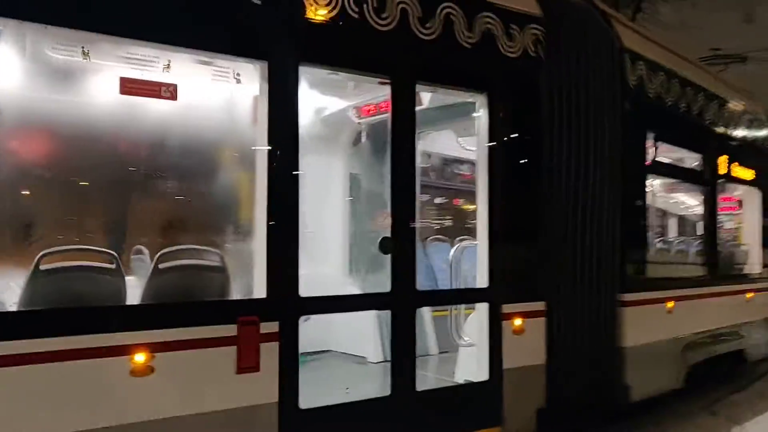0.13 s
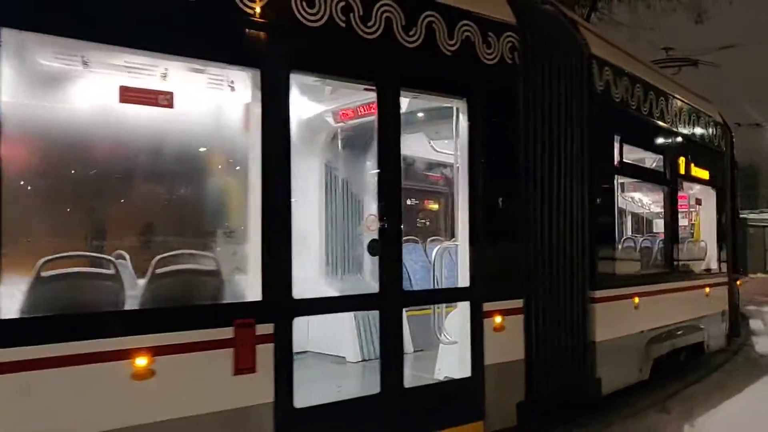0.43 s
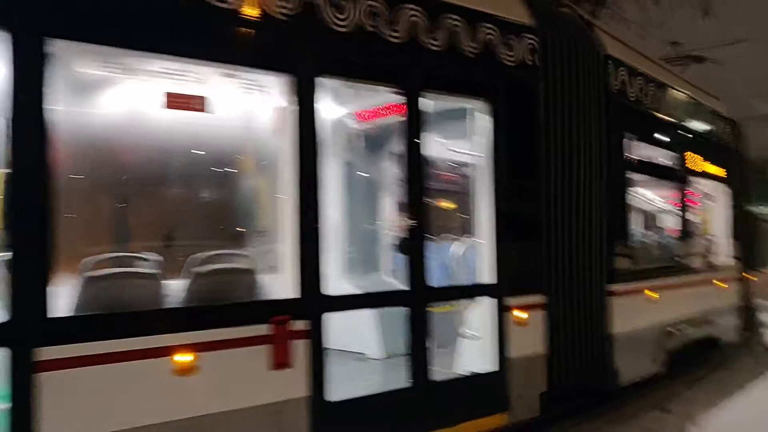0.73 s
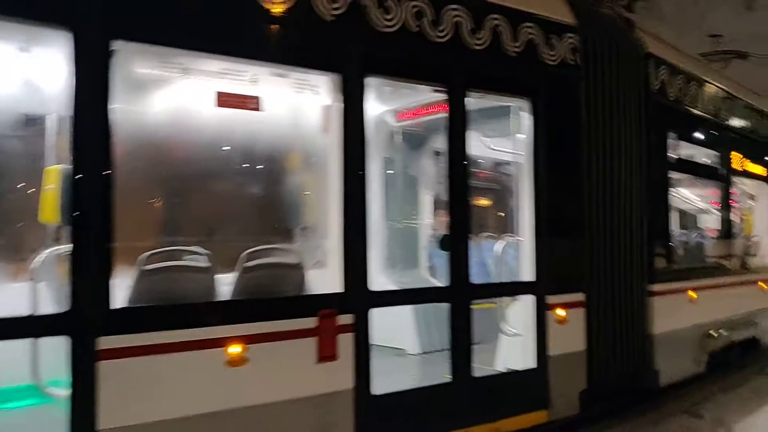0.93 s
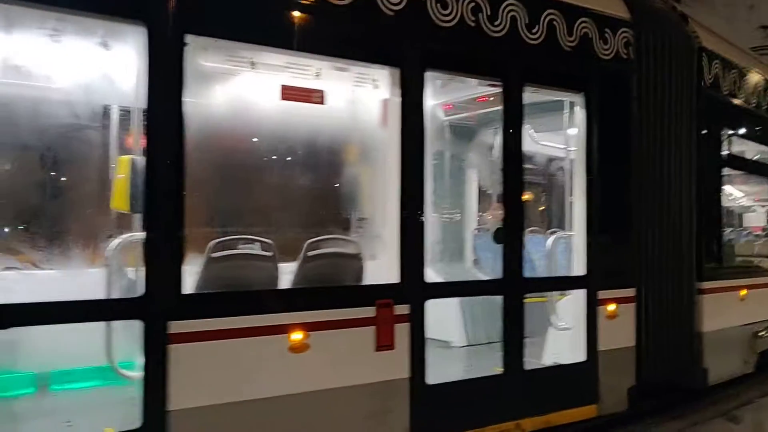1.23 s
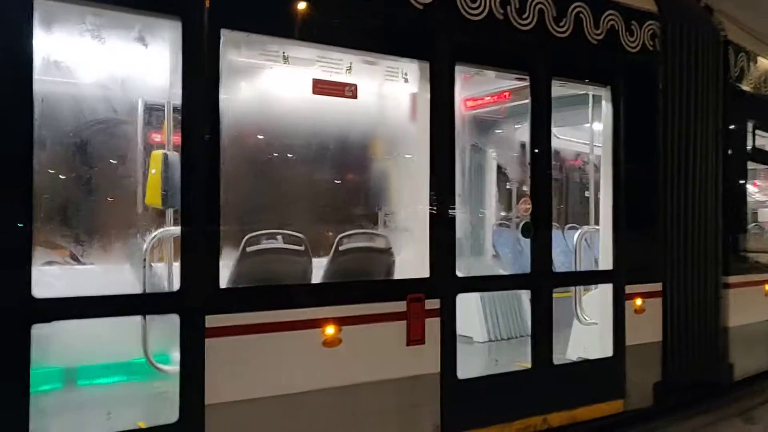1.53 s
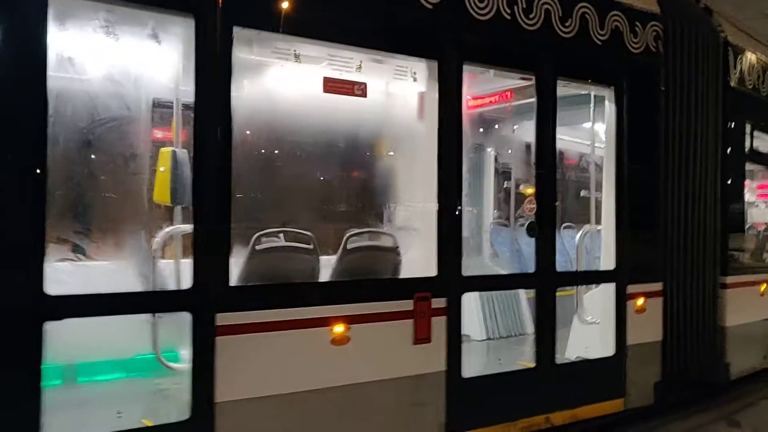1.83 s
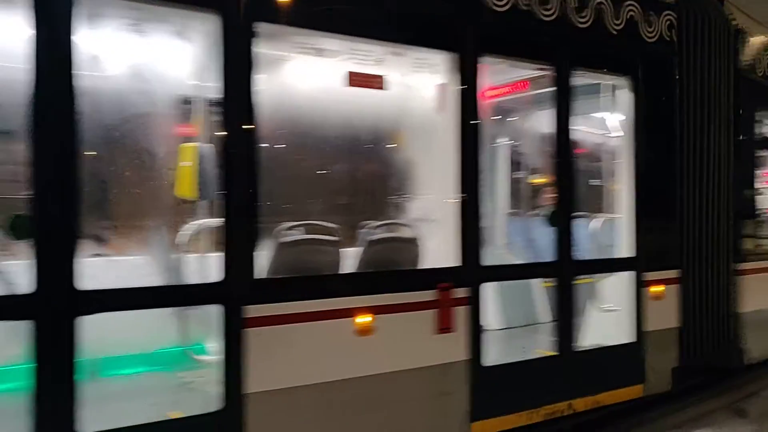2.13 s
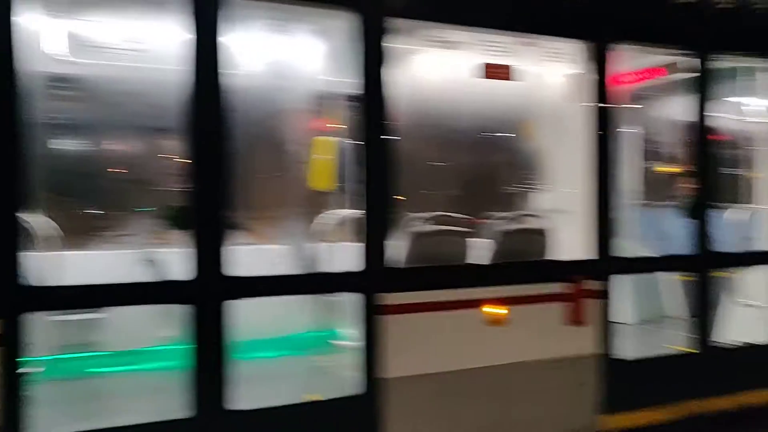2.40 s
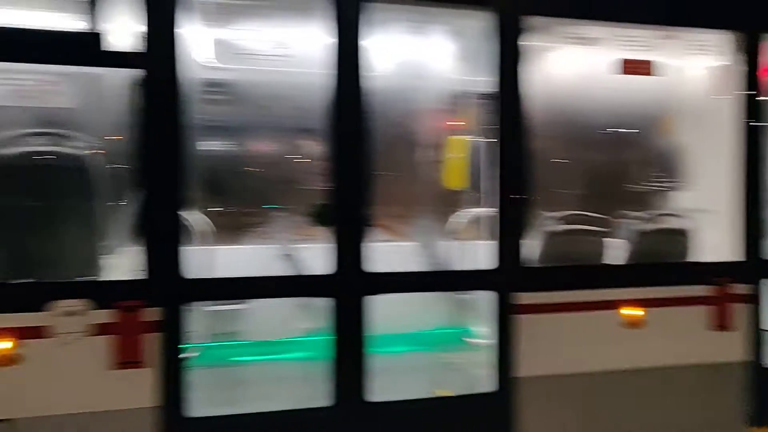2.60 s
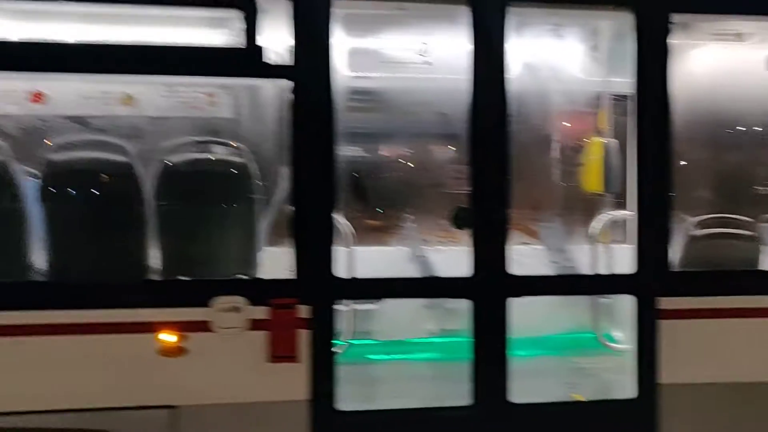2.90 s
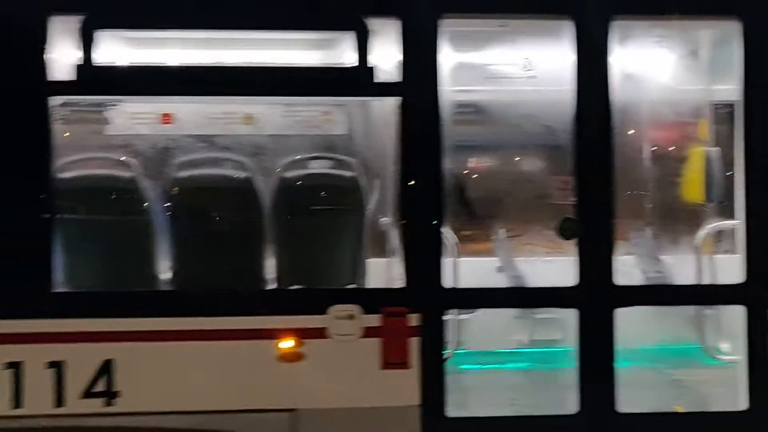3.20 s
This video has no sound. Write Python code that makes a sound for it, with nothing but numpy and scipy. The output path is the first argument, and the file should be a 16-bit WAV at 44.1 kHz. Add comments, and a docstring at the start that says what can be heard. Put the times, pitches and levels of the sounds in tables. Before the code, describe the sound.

A parked tram rumbles and hums deeply at night, with fan rush and a fading high whine.

```python
"""Beside a parked tram at night, machinery rumbles and hums, fans rush from the left and a converter whines.
A motor runs down, and the whine fades out of earshot as someone walks slowly along the tram's side.
Close by are soft scuffs, ticks, a small squeak, three bumps on the microphone and wind on its left port.
Shaped noise makes the rumble, drone, fans, scuffs, ticks and wind; sine waves make the hum, whine and squeak.
Smooth pulses make the bumps and wind slaps."""
import sys
import numpy as np
from scipy.fft import rfft, irfft, next_fast_len
from scipy.io import wavfile
from scipy.ndimage import map_coordinates

SR = 44100
rng = np.random.default_rng(int(sys.argv[2]) if len(sys.argv) > 2 else 0)


def inscribe(sig):
    """Save sig as 16-bit PCM at rate SR to the path in sys.argv[1].

    A 1-D sig is mono; a 2-D sig holds one channel per row.
    Samples are clipped to [-1, 1] before scaling.
    """
    pcm = np.round(np.clip(np.atleast_2d(sig).T, -1, 1) * 32767)
    wavfile.write(sys.argv[1], SR, pcm.astype(np.int16))


N = 147735


def amp(db):
    """Turn decibels into a plain multiplier."""
    return 10 ** (np.asarray(db) / 20)


def unit(x):
    """Scale a sound to an average (rms) strength of 1."""
    return x / np.sqrt(np.mean(x ** 2) + 1e-20)


def clock():
    """The time of every sample in seconds."""
    return np.arange(N) / SR


def colour(points, hz):
    """Turn (Hz, dB) points into a gain at each frequency, joined on a log axis."""
    point_hz, point_db = np.transpose(points)
    return amp(np.interp(np.log(hz + 1), np.log(point_hz + 1), point_db))


def curves(rows):
    """Draw each column after the time as a curve with one value per sample."""
    times, *columns = np.transpose(rows)
    return [np.interp(clock(), times, column) for column in columns]


def wobble(rate):
    """A smooth random curve through rate random points a second."""
    return map_coordinates(rng.standard_normal(2048), [clock() * rate], mode="mirror")


def filtered(x, response):
    """Multiply each frequency of x by a response, which may also shift its timing."""
    size = next_fast_len(N + 8192)
    spectrum = rfft(x, size) * response(np.fft.rfftfreq(size, 1 / SR))
    return irfft(spectrum, size)[..., :N]


def rush(spectrum, alike):
    """Stereo noise of rms 1, rolled off in the high treble; alike is the likeness of left and right."""
    def shape(hz):
        roll_off = (1 + (hz / (2 * spectrum[-1][0])) ** 2) ** 2
        return colour(spectrum, hz) / roll_off

    mid, side = filtered(rng.standard_normal((2, N)), shape)
    turn = np.arccos(np.clip(alike, -1, 1)) / 2
    return unit(np.cos(turn) * mid + np.sin(turn) * np.array([side, -side]))


def swell(s, width):
    """A bell-shaped rise and fall around time s; width is its standard deviation in seconds."""
    return np.exp(-.5 * ((clock() - s) / width) ** 2)


def from_left(x, lag_s):
    """Sound from the left reaches the left port lag_s seconds before the right."""
    sides = np.array([[1], [-1]])
    return filtered(x, lambda hz: np.exp(1j * np.pi * hz * lag_s * sides))


def machinery(rumble_alike=0.58, drone_alike=0.97):
    """Low noise makes the deep rumble; a higher, more restless band makes the drone of the body."""
    # Loudness over time: t/s, level/dB
    rumble_level = [(0, -28.5), (.6, -26.5), (1.3, -25.5), (1.55, -25), (1.68, -23), (1.85, -25),
                    (2.05, -32), (2.6, -28.5), (3.35, -25)]
    drone_level = [(0, -34), (.17, -29), (.45, -33), (1, -34), (1.35, -39), (1.7, -39.5), (2, -38.5),
                   (2.5, -39.5), (3.35, -43.5)]
    # Relative strength per hertz: f/Hz, level/dB
    rumble_spectrum = [(12, -18), (22, 0.5), (33, 5), (50, -0.5), (75, -4.5), (100, -7.5), (130, -17),
                       (250, -29.5), (500, -34)]
    drone_spectrum = [(70, -13), (112, 1), (128, -2.5), (150, 2), (180, -3.5), (215, -7), (260, -9),
                      (320, -9.5), (380, -16.5), (600, -26.5), (1500, -39)]
    rumble_db, = curves(rumble_level)
    drone_db, = curves(drone_level)
    rumble = amp(rumble_db + 0.32 * wobble(6.7)) * rush(rumble_spectrum, rumble_alike)
    drone = amp(drone_db + 1.3 * wobble(17)) * rush(drone_spectrum, drone_alike)
    return rumble + drone


def hum(waver_db=1.5, waver_rad=0.27, tone_wander_rad=1.2):
    """A motor's firm low note and weaker machine tones are sine waves that wander in pitch and level."""
    # Motor note: t/s, f/Hz, level/dB
    note_path = [(0, 59.4, -36.5), (.11, 57.1, -23), (.2, 57, -32), (.33, 56.2, -38), (.42, 58.8, -24),
                 (.54, 59.35, -22.5), (.65, 58.62, -29.5), (.85, 60.7, -23), (.96, 59.75, -34.5),
                 (1.1, 60.44, -27.5), (1.25, 60.63, -33), (1.43, 60.1, -27), (1.53, 59.77, -29),
                 (1.65, 60, -26), (1.75, 60.33, -33.5), (2.09, 59.96, -29), (2.25, 59.46, -35.5),
                 (2.5, 59.74, -23.5), (2.62, 60.1, -27.5), (2.8, 59.87, -28), (2.89, 60.07, -31),
                 (3.07, 60.56, -20), (3.22, 58.4, -42), (3.35, 63.3, -24.5)]
    # Weaker machine tones: f/Hz, level/dB
    weak_tones = [(100, -46), (329, -53.5)]
    hz, level_db = curves(note_path)
    # Adding up the pitch gives the phase of the wave
    phase = 2 * np.pi * np.cumsum(hz) / SR + waver_rad * wobble(30.24)
    sound = amp(level_db + waver_db * wobble(19)) * np.sin(phase)
    for tone_hz, db in weak_tones:
        tone_phase = 2 * np.pi * tone_hz * clock() + tone_wander_rad * wobble(5)
        sound += amp(db + 2.16 * wobble(5.98)) * np.sin(tone_phase)
    return np.sqrt(2) * sound  # a sine of height sqrt(2) has rms 1


def run_down(octave_below_db=-1, waver_rad=0.11):
    """As a motor slows, its tone and the octave below sink together."""
    # Slowing motor: t/s, f/Hz, level/dB
    motor_path = [(1.1, 334, -86), (1.22, 327.6, -47.5), (1.38, 309.5, -48), (1.55, 284.2, -53),
                  (1.66, 271, -41.5), (1.8, 251.5, -43), (1.92, 237.2, -83)]
    hz, level_db = curves(motor_path)
    phase = 2 * np.pi * np.cumsum(hz) / SR + waver_rad * wobble(30)
    tones = np.sin(phase) + amp(octave_below_db) * np.sin(phase / 2)
    return np.sqrt(2) * amp(level_db) * tones


def fans(street_db=-43, lag_s=0.000452, pan_db=-2):
    """Fan noise reaches the left port first; the street scatters it back, under a hiss of air."""
    # Relative strength per hertz of direct fans, street return and air hiss: f/Hz, level/dB
    fan_spectrum = [(200, -0.5), (400, -4), (600, -1), (850, 1.5), (1300, -1), (1700, -6.5), (2300, -12),
                    (3200, -16), (5000, -30.5), (9000, -18.5)]
    street_spectrum = [(150, -32), (310, 1.5), (400, -1.5), (550, -3.5), (950, -0.5), (1400, -12.5),
                       (2100, -11.5), (3000, -27), (4500, -26), (9000, -37.5)]
    hiss_spectrum = [(1500, -25), (3000, -0.5), (4200, -1), (5400, 1), (6300, 1.5), (7200, -2),
                     (8400, -2.5), (10000, 0), (15000, -2.5)]
    # Loudness along the tram: t/s, level/dB
    fan_level = [(0, -40.5), (.8, -45), (1.6, -44), (2.3, -46), (2.8, -43.5), (3.35, -44.5)]
    hiss_level = [(0, -45.5), (.4, -47.5), (.8, -47.5), (1.05, -50), (1.3, -50), (1.5, -48.5),
                  (1.85, -47.5), (2.1, -51.5), (2.55, -53), (2.85, -50.5), (3.35, -52)]
    fan_db, = curves(fan_level)
    hiss_db, = curves(hiss_level)
    direct = from_left(rush(fan_spectrum, alike=0.97), lag_s) * amp(fan_db + 2.0 * wobble(6.05))
    scattered = rush(street_spectrum, alike=0.068) * amp(street_db + 0.87 * wobble(4.1))
    hiss = rush(hiss_spectrum, alike=0) * amp(hiss_db + 0.83 * wobble(19))
    # pan_db is left minus right: the fans come first on the left, yet are slightly louder on the right
    balance = amp(pan_db / 2 * np.array([[1], [-1]]))
    return (direct + scattered) * balance + hiss


def whine(beat_hz=16, beat_wander_rad=1.2, echo_db=-4.5, lag_s=.00044):
    """The converter's tone beats with its reflection; its overtones flutter less and fade sooner."""
    # Whine as the listener walks: t/s, f/Hz, level/dB, left minus right/dB
    whine_path = [(0, 5024, -48, 6), (.11, 5024, -41, 7), (.2, 5020, -47.5, 3), (.38, 5018, -51, 2),
                  (.52, 5014, -48.5, 3), (.75, 5010, -51.5, 1), (.9, 5014, -48.5, 4),
                  (1.05, 5010, -51.5, 3), (1.25, 5010, -49.5, 3), (1.82, 5008, -53, -1),
                  (1.95, 5000, -62, 2), (2.05, 4998, -60, 4), (2.2, 4995, -80, 0)]
    # Tones within the whine: multiple of the main pitch, relative level/dB
    partials = [(1, -.5), (1.496, -9.5), (1.999, -4), (3, -21)]
    flutter_rate, fuzz_rate = 30, 140  # random points per second
    flutter_depth_db, fuzz_depth_db = 1.8, 2.5
    drift_rad, fuzz_rad = .4, .3
    overtone_fade = 1.5  # dB per second
    hz, level_db, pan_db = curves(whine_path)
    phase = 2 * np.pi * np.cumsum(hz) / SR + drift_rad * wobble(flutter_rate)
    beat = 2 * np.pi * beat_hz * clock() + beat_wander_rad * wobble(beat_hz)
    flutter_db = flutter_depth_db * wobble(flutter_rate)

    def partial(k):
        """One tone and its reflection, at k times the main pitch."""
        beads = unit(amp(flutter_db / k + fuzz_depth_db * wobble(fuzz_rate)))
        direct = k * (phase + fuzz_rad * wobble(fuzz_rate))
        echo = k * (phase - beat) + drift_rad * wobble(flutter_rate)
        pair = unit(np.sin(direct) + amp(k * k * echo_db) * np.sin(echo))
        fade_db = -overtone_fade * clock() * (k > 1)
        return amp(fade_db) * beads * pair

    # Each port gets its own fine randomness
    ports = np.array([sum(amp(db) * partial(k) for k, db in partials) for _ in range(2)])
    balance_db = pan_db / 2 * np.array([[1], [-1]])
    return amp(level_db + balance_db) * from_left(ports, lag_s)


def scuffs(octaves=0.22, grain_db=7.5):
    """Shoes or clothing brush softly: bands of noise swell briefly with a grainy loudness."""
    # Brushes: t/s, width/s, centre f/Hz, level/dB
    brushes = [(0.146, 0.022, 8300, -49), (.228, 0.016, 5700, -46.5), (.265, 0.016, 4400, -48),
               (1.68, 0.039, 8400, -48.5), (1.825, 0.022, 4040, -53), (2.735, 0.028, 6060, -53)]
    out = np.zeros((2, N))
    for s, width, centre_hz, db in brushes:
        def band_shape(hz):
            return 1 / (1 + (np.log2((hz + 1) / centre_hz) / octaves) ** 2)

        band = filtered(rng.standard_normal((2, N)), band_shape)
        grains = unit(band * amp(grain_db * wobble(300)))
        out += amp(db) * swell(s, width) * grains
    return out


def ticks(pivot_hz=8500, t60_s=.006):
    """Short clicks are noise that starts at once and dies fast, some brighter than others."""
    # Clicks: t/s, starting level/dB, treble tilt/(dB per octave)
    clicks = [(.687, -25, 25), (0.7, -37.5, 5), (1.601, -37, -6), (1.672, -36, 5), (1.7237, -25.5, -1.5),
              (2.0468, -28, -2.5), (3.138, -38, -5)]
    # Click strength per hertz before tilting: f/Hz, level/dB
    click_spectrum = [(3000, -22), (6000, -36), (8200, 2), (10000, -6), (15000, -10.5)]
    t, out = clock(), np.zeros((2, N))
    for s, db, tilt_db in clicks:
        tilted = [(hz, level + tilt_db * np.log2(hz / pivot_hz)) for hz, level in click_spectrum]
        crack = rush(tilted, alike=0)
        # The level falls by 60 dB in t60_s seconds
        out += (t >= s) * amp(db - 60 * abs(t - s) / t60_s) * crack
    return out


def squeak(right_db=-6, glide_hz_per_s=4000, rough_rad=.8):
    """One faint, slightly rough sine wave rises in pitch, louder on the left."""
    # Squeak, a single row: t/s, width/s, f/Hz at the middle, level/dB
    squeak_row = (1.812, .014, 2490, -47.5)
    s, width, hz, db = squeak_row
    t = clock() - s
    phase = 2 * np.pi * (hz * t + glide_hz_per_s * t ** 2 / 2) + rough_rad * wobble(250)
    return np.sqrt(2) * amp(db) * swell(s, width) * np.sin(phase) * amp([[0], [right_db]])


def bumps(push_s=0.00076, push_delay_s=0.0027, push_db=-5.5):
    """A finger taps the housing, then pushes more softly; a longer contact sounds duller."""
    # Taps: t/s, level/dB, contact width/s
    taps = [(2.5421, -17, 0.00025), (2.6349, -21, 0.00032), (2.7208, -14.5, .00024)]
    out = 0
    for s, db, tap_s in taps:
        push = amp(push_db) * swell(s + push_delay_s, push_s)
        out = out + amp(db) * (swell(s, tap_s) + push)
    return out


def puff(right_db=-22, slap_s=0.00069, flutter_db=1.5):
    """A breeze buffets the left port with low noise and slaps it with two short pressure pulses."""
    # Breeze loudness: t/s, level/dB
    puff_level = [(3.1, -72), (3.165, -23.5), (3.21, -25), (3.235, -26.5), (3.28, -18), (3.31, -17),
                  (3.35, -25)]
    # Breeze strength per hertz: f/Hz, level/dB
    wind_spectrum = [(15, -12), (40, -2), (100, 4.5), (170, 5), (280, -8), (420, -22.5), (1000, -42),
                     (3000, -82)]
    # Slaps: t/s, level/dB
    slap_rows = [(3.203, -12.5), (3.3058, -8)]
    level_db, = curves(puff_level)
    buffet = amp(level_db + flutter_db * wobble(50)) * rush(wind_spectrum, alike=0)
    slaps = sum(amp(db) * swell(s, slap_s) for s, db in slap_rows)
    return (buffet + slaps) * amp([[0], [right_db]])


def scene():
    """Add the tram's sounds and the small sounds close by."""
    tram = machinery() + hum() + run_down() + fans() + whine()
    close_by = scuffs() + ticks() + squeak() + bumps() + puff()
    return tram + close_by


def record(dry, top_hz=15400):
    """Left and right are shaped differently in the treble; nothing passes above top_hz."""
    # Treble shaping of left and right: f/Hz, level/dB
    left_treble = [(3000, 0.5), (5000, 2), (6300, 5.5), (7400, -4.5), (8100, -10), (9000, -21),
                   (10500, -24.5), (13000, -12.5), (15000, -20)]
    right_treble = [(3000, 1), (5000, 3.5), (6300, -2.5), (7400, 3.5), (8700, 1), (9600, -13), (10000, -11),
                    (10600, -25), (12500, -10), (15000, -18.5)]

    def response(hz):
        return np.array([colour(left_treble, hz), colour(right_treble, hz)]) * (hz < top_hz)

    return filtered(dry, response)


dry = scene()
out = record(dry)
inscribe(out)
```